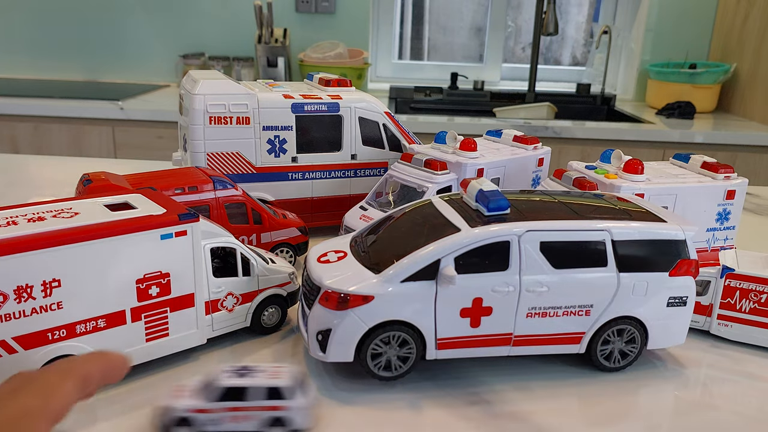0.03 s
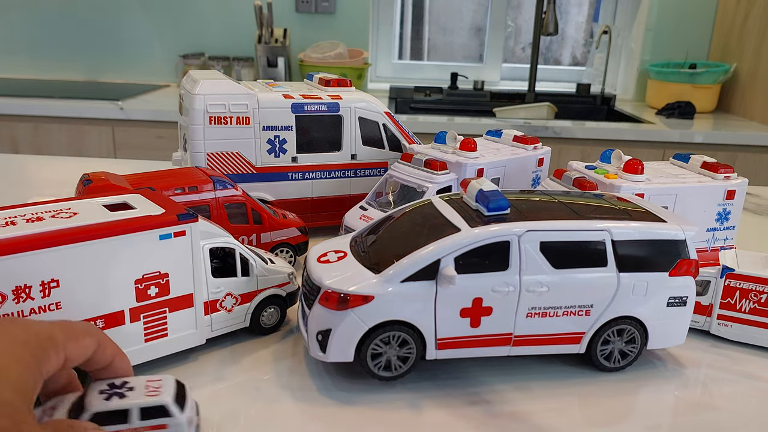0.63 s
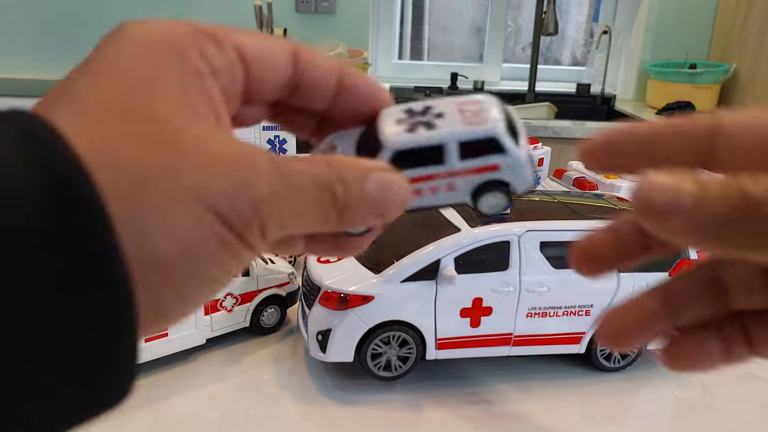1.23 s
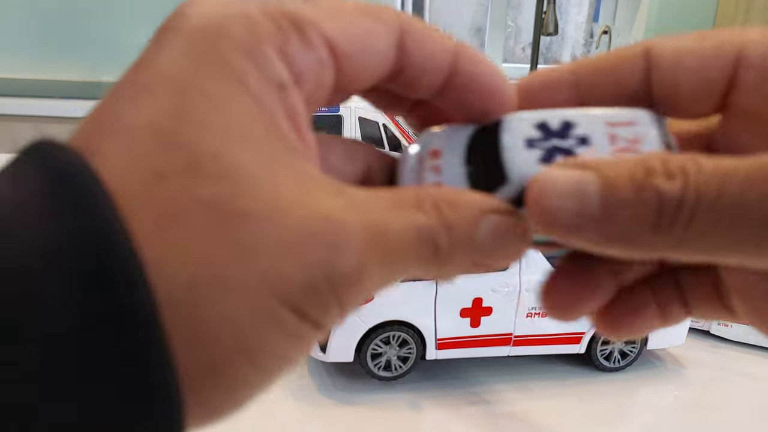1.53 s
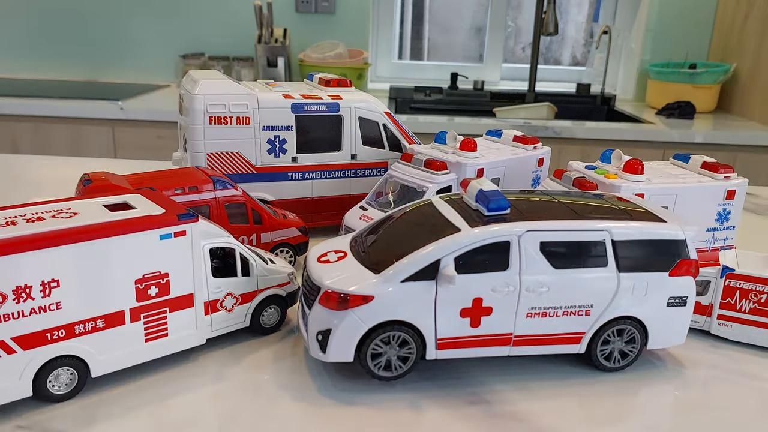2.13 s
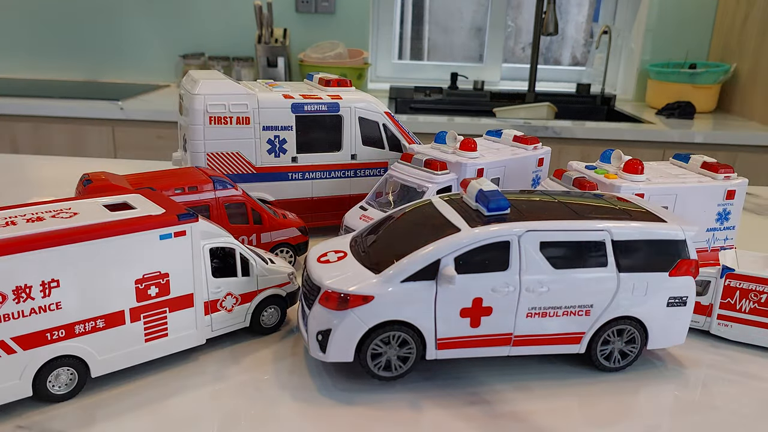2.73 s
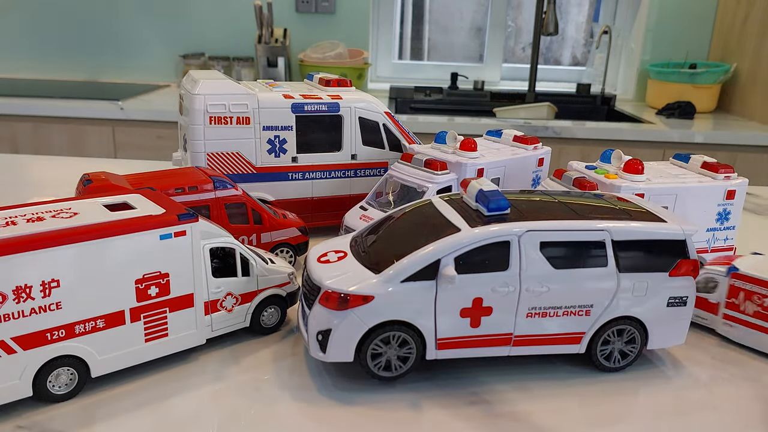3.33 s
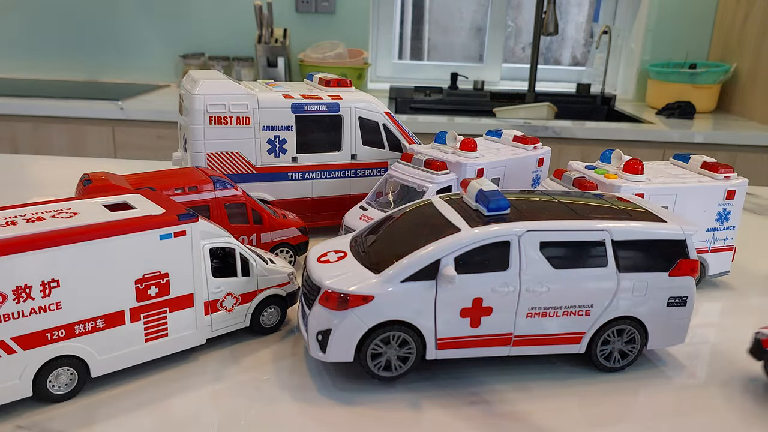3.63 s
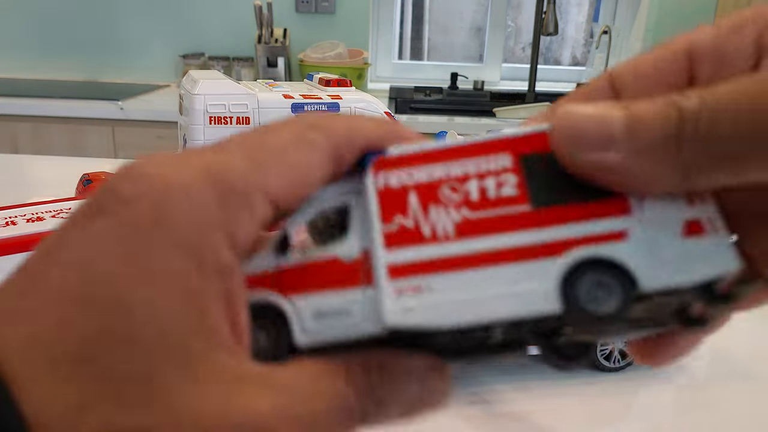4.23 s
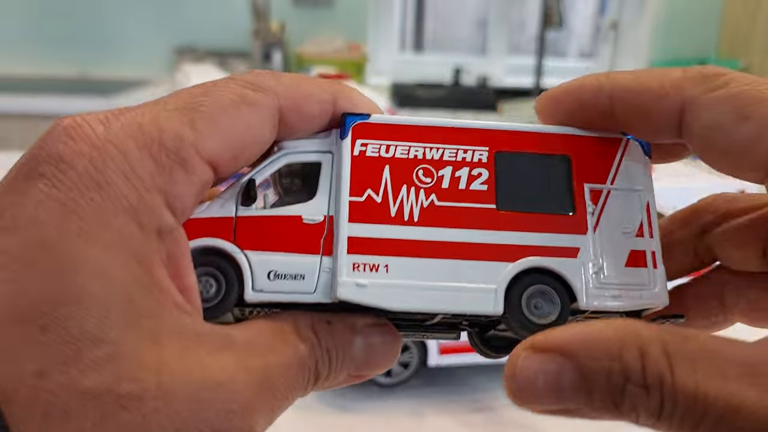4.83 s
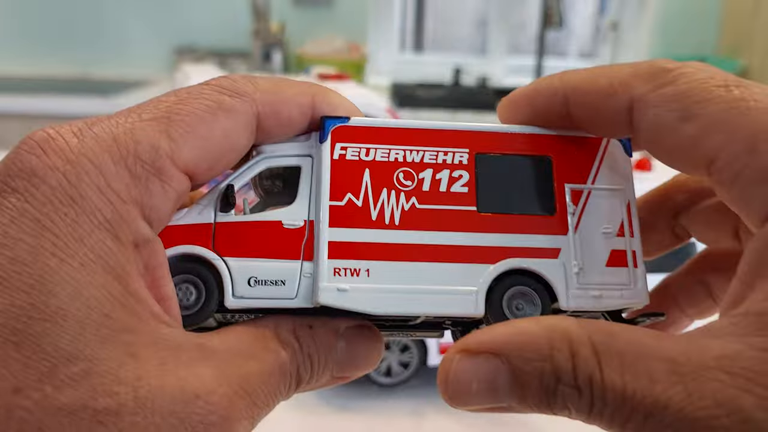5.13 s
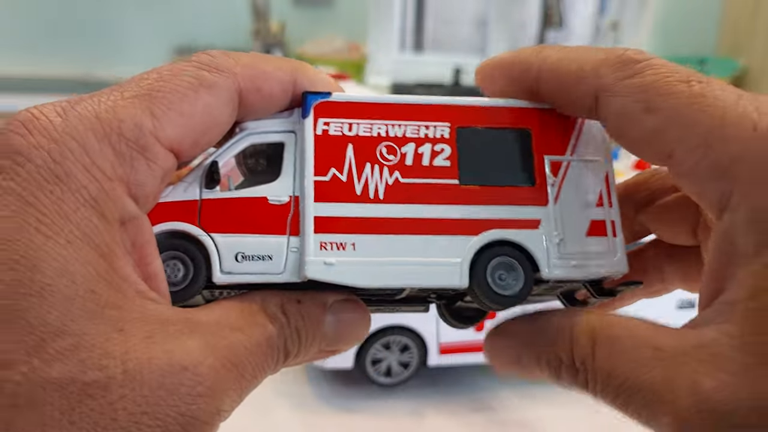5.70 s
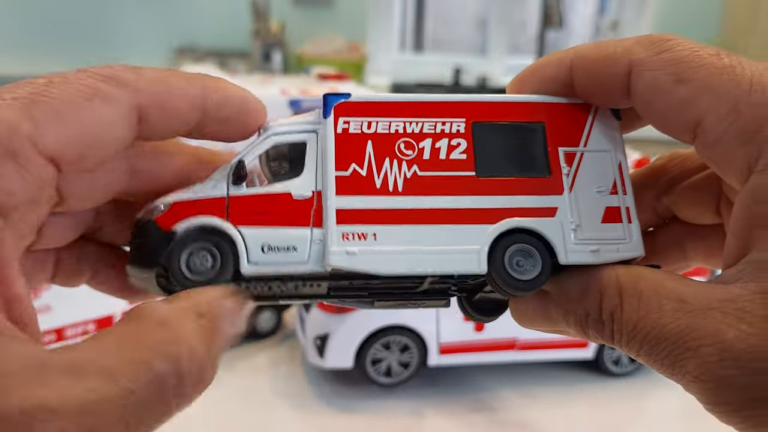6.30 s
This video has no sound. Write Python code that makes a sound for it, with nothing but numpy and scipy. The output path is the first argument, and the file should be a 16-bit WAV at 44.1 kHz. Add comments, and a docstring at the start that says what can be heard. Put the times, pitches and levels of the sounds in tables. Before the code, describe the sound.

A small toy car rolls briefly on a table with a thin axle squeak, then clicks and rasps as it is picked up and turned in the hands. It is put aside with a hollow, bouncing clatter, the loudest sound. A larger toy van then scrapes along the table and is turned in the fingers with scattered light clicks and rubs. The handling is close and dry in a quiet room with a faint hum.

```python
"""A table in a quiet room with mains hum; toy cars are handled close to the microphone.
A small car rolls with a singing axle, is picked up and rasps in the cupped hand; put aside, it lands
with a hollow clatter. A larger model van is pulled from the row and turned in the fingers, shell and
doors clicking. Clicks are noise bursts and rubbing is a stream of tiny slips, both ringing the shells;
the landing also rings the modes of the hollow surface."""
import sys
import numpy as np
from scipy import signal
from scipy.fft import rfft, irfft
from scipy.io import wavfile
from scipy.ndimage import uniform_filter1d

SR = 44100
rng = np.random.default_rng(int(sys.argv[2]) if len(sys.argv) > 2 else 0)


def generate_wav(sig):
    """Save sig (samples, or channels by samples) to the path in sys.argv[1] as 16-bit PCM at SR."""
    pcm = np.round(np.clip(np.atleast_2d(sig).T, -1, 1) * 32767).astype(np.int16)
    wavfile.write(sys.argv[1], SR, pcm)


N = 284886
TIME = np.arange(N) / SR
BAND_EDGES_HZ = [3000, 7500]  # body | edge | fizz

CAR_MODES = [(1810, 0.5, 80), (2080, -1, 130), (2260, 5, 130), (2640, 7.5, 110), (4040, 5, 81),
             (4800, 5.5, 67), (5450, 6, 140), (5870, 7, 110), (6500, 3.5, 120), (8740, 5.5, 500),
             (11000, -5, 370), (13100, 4, 340)]  # small car's shell: f/Hz, peak/dB, width/Hz
CAR_COLOUR = [(300, -17), (750, -22), (1150, -9.5), (1400, -14.5), (1750, -6), (2100, -2), (2700, -10.5),
              (3250, -14), (4150, -7), (4950, -10.5), (5800, -8), (7400, -13.5), (9500, -12.5),
              (12000, -8.5), (16000, -15.5)]  # its contact spectrum: f/Hz, level/dB
ROLL_COLOUR = [(410, -43.5), (700, -13), (946, -5), (1230, -7), (2130, 0), (3280, -11), (4210, 0),
               (5060, -3.5), (5760, -5.5), (8210, -21), (11100, -18), (15200, -20), (16000, -26)]  # rolling and brushing spectrum: f/Hz, level/dB
DIFFUSE_CORRELATION = [(60, 0.62), (150, 0.9), (300, 0.8), (600, 0.33), (1200, 0), (16000, 0.11)]  # room sound, left to right: f/Hz, correlation


def car_clicks():
    """Light knocks ring the small car's shell."""
    hits = [(0.154, -56, 3, -3.5, 4330), (0.1904, -57.5, -7.5, -2.5, 2700), (0.2997, -68.5, -2, 3, 1070),
            (0.3606, -81, 15, 4, 4790), (0.385, -73.5, -13, -4.5, 1750), (0.4414, -58.5, 5, 1.5, 2060),
            (0.459, -60.5, -5, 2.5, 2060), (0.4918, -53, 2, 2, 2120), (0.5122, -54.5, -10.5, -3, 2120),
            (0.6699, -69.5, -7.5, 11, 1980), (0.7203, -67.5, 2, 3.5, 3860), (0.7731, -60, -2, 4, 2200),
            (0.8091, -65, -7, 2, 2770), (0.8215, -62, 1, 5, 2370), (0.834, -58, -3, -2.5, 2340),
            (0.9028, -62, -6, -1, 2820), (0.922, -66, 3, -2, 2850), (0.9956, -65, 2, 4, 2270),
            (1.012, -62, -12, 3, 2570), (1.043, -63, -12.5, 14, 2260), (1.1338, -65.5, 20.5, 7, 2240),
            (1.1643, -59, 17, 4.5, 2030), (1.1892, -58, 6, 3, 2230), (1.2904, -49.5, 7, 6, 2230),
            (1.3843, -48.5, 0, 21, 5800), (1.509, -41, -1, 2.5, 2040), (1.5144, -49, -13, 31, 2080),
            (1.5309, -48.5, -4, 2, 2090), (1.5828, -70, -14.5, 24, 2150), (1.6247, -60.5, -7, -4, 5400),
            (1.6571, -50.5, -1.5, 3, 2230), (1.8507, -60.5, -4, 8, 2040), (1.9535, -72.5, -7, -10, 1330)]  # t/s, level/dB, hardness/(dB/band), pan/dB, spot f/Hz
    return clicks(hits, CAR_MODES, CAR_COLOUR, t60_s=0.023, spot_db=19.5, spot_q=6.1,
                  lift_db=7, band_db=(-8, -1.5, -10.5), shadow=0.55)


def car_roll():
    """Wheels rattle over the table with each push."""
    pushes = [(-0.01, 0.13, -48.5, -0.5, -2.5), (0.132, 0.073, -44.5, 1, 4), (0.25, 0.21, -64, 1, 10),
              (0.437, 0.08, -52, 1.5, 10), (0.548, 0.022, -63, 7, -2)]  # t/s, length/s, level/dB, hardness/(dB/band), swell/dB
    gains = strokes(pushes, attack_s=0.0068, release_s=0.018)
    return rubbing(gains, CAR_MODES[:1], ROLL_COLOUR, rate_hz=630, spread_db=5.5, t60_s=0.012,
                   hiss_db=0.6, band_db=(-0.3, -1.4, -10), pan_db=2.5)


def axle(width_hz=200, sag_hz_per_s=5200):
    """The axle sings on a push: narrow noise whose pitch sinks as the car slows."""
    whistles = [(0, 0.1, 4450, -57), (0.133, 0.041, 4400, -43), (0.421, 0.09, 3830, -53.5)]  # t/s, length/s, start f/Hz, level/dB
    pole = np.exp(-np.pi * width_hz / SR)
    noise = rng.standard_normal((2, N)) + 1j * rng.standard_normal((2, N))
    fuzz = signal.lfilter([1], np.poly([pole, pole]), noise)
    out = np.zeros((2, N))
    for start_s, length_s, hz, db in whistles:
        pitch_hz = hz - sag_hz_per_s * np.clip(TIME - start_s, 0, length_s)
        whistle = unit((fuzz * np.exp(2j * np.pi * np.cumsum(pitch_hz) / SR)).real)
        out += whistle * amp(db) * envelope(start_s, length_s, attack_s=0.0065, release_s=0.008)
    return out * panned(4.2)


def car_rasp(thinning=0.29):
    """Wheels and shell rasp in the hand; the body band thins as the fizz rises."""
    rub = [(0.68, -62, -12), (0.826, -52.5, -17), (0.874, -57, -14), (0.922, -43.5, -14.5),
           (0.966, -51, -12), (1.014, -46.5, -20), (1.092, -57, -7), (1.198, -43, -2), (1.358, -37, -6.5),
           (1.458, -43, -6), (1.5, -37.5, -12)]  # t/s, level/dB, relative fizz/dB
    t, db, fizz_db = np.transpose(rub)
    levels_db = [db - thinning * (fizz_db - fizz_db.mean()), db, db + fizz_db]
    gains = amp([np.interp(TIME, t, level) for level in levels_db])
    gains *= envelope(t[0], t[-1] - t[0], attack_s=0.0083, release_s=0.011)
    return rubbing(gains, CAR_MODES, CAR_COLOUR, rate_hz=1000, spread_db=3.5, t60_s=0.009,
                   hiss_db=-7, band_db=(-4.5, -2, 2.5), pan_db=2.0)


def cupped_hand(x, width_hz=330, resonance_db=7):
    """Air in the hand adds one resonance, moving as the hollow changes size."""
    hollow = [(0.7, 1840), (0.83, 2300), (0.93, 2900), (1.02, 2480), (1.1, 2160), (1.42, 2270), (1.5, 1890)]  # t/s, f/Hz
    centre_hz = np.interp(TIME, *np.transpose(hollow))
    carrier = np.exp(2j * np.pi * np.cumsum(centre_hz) / SR)
    pole = np.exp(-np.pi * width_hz / SR)
    baseband = signal.lfilter([1 - pole], [1, -pole], x / carrier + 1e-18)
    return x + amp(resonance_db) * 2 * (carrier * baseband).real


def landing():
    """The small car bounces, ringing more freely once let go."""
    bounces = [(2.4978, -34.5, -1.5, -3, 2400), (2.5175, -38, -0.5, -1.5, 6000),
               (2.5284, -37.5, -5, -1.5, 1810), (2.5484, -54, 7.5, -5, 5030), (2.5622, -44.5, -4, -1, 4200),
               (2.6257, -55, -4, 0, 2130), (2.6473, -53.5, -8.5, -1.5, 1860), (2.6824, -53, -4.5, -2, 1870),
               (2.7568, -67.5, 1.5, -0.5, 1240)]  # t/s, level/dB, hardness/(dB/band), pan/dB, spot f/Hz
    modes = [(1810, 3.5, 42), (1930, 2.5, 230), (2490, 5, 60), (2620, 6, 52), (2880, 6, 42),
             (4830, -3, 31.5), (5400, -19, 41), (6000, -9, 70), (7070, 9.5, 66)]  # free shell: f/Hz, peak/dB, width/Hz
    colour = [(200, -7.5), (500, 0.5), (850, -2), (1100, -5.5), (1500, -3), (2100, 1), (3500, -6.5),
              (5200, 0.5), (7000, -10.5), (8700, -11.5), (12000, -2), (16000, -11)]  # contact spectrum: f/Hz, level/dB
    return clicks(bounces, modes, colour, t60_s=0.057, spot_db=4, spot_q=13,
                  lift_db=6, band_db=(-6, -0.7, -0.3), shadow=4.5)


def thuds():
    """The car's weight hits the hollow surface; shorter contacts reach higher modes."""
    impacts = [(2.501, -24.5, 0.00043), (2.506, -16.5, 0.00093), (2.5155, -22, 0.00069),
               (2.530, -28.5, 0.0016), (2.539, -19.5, 0.0007), (2.563, -26.5, 0.0007),
               (2.647, -26.5, 0.00046), (2.684, -31.5, 0.0017)]  # t/s, level/dB, contact/s
    surface_modes = [(118.8, -8.5, 0.38), (167, -3, 0.07), (200, 4, 0.061), (243.5, -8, 0.26),
                     (302, -3.5, 0.065), (348, -0.5, 0.078), (386, -7, 0.12), (471, -4, 0.1),
                     (600, -22, 0.12), (690, 3, 0.042), (796, -13.5, .14), (950, -17, .08)]  # f/Hz, level/dB, t60/s
    t = np.arange(SR // 2) / SR
    out = np.zeros((2, N))
    for start_s, db, contact_s in impacts:
        ring = sum(amp(mode_db - 60 * t / t60_s) * np.sin(2 * np.pi * hz * t)
                   / (1 + (hz * contact_s) ** 2) for hz, mode_db, t60_s in surface_modes)
        add(out, start_s, amp(db - 8) * panned(-0.34) * ring)
    return butterworth(out, 100, "high")  # little radiates below the first mode


def van():
    """The van's shell and doors click; it scrapes along the table and under the fingers."""
    hits = [(3.261, -69, -12.5, -2.5, 1200), (3.2985, -60.5, -11, -3, 1240), (3.3187, -55, -7.5, -3, 1290),
            (3.402, -69.5, -12, -3, 1110), (3.5541, -56, -9, -3, 1090), (3.587, -65.5, -3, 0.5, 1200),
            (4.091, -74.5, 1.5, 1, 1900), (4.1759, -56, -5.5, 1, 1600), (4.2016, -38, 1.5, 1.5, 1193),
            (4.2024, -46, 0, 1, 6000), (4.4127, -63.5, -3.5, 0, 2100), (4.492, -61, -2.5, 1.5, 2030),
            (4.675, -75, -4, 0, 2000), (4.717, -70.5, -6, 7, 2080), (4.761, -64.5, -6, 2.5, 2070),
            (4.797, -69, 8, 4.5, 2770), (5.303, -83, -15.5, 1.5, 1200), (5.3233, -69.5, -6, -0.5, 4540),
            (5.392, -70.5, -7, 2, 1800), (5.4411, -59.5, -7.5, 8, 1860), (5.5724, -65.5, -15.5, -3.5, 1670),
            (5.7075, -54.5, -2, 8, 1920), (5.7843, -57, -2, 2, 1190), (5.8107, -54, -7, 9, 1110),
            (5.8515, -47, -3, 0.5, 3570), (5.8528, -46, 9, 0.5, 4800), (5.9465, -57, -11, 1, 2750),
            (6.112, -77, 8, 3, 1820), (6.132, -67, 0, 1.5, 1860), (6.1695, -59, -7, 1.5, 1260),
            (6.326, -52.5, -9.5, 3.5, 1310), (6.3783, -61, -4, 0, 1270), (6.4274, -57, -12.5, -1, 1270)]  # t/s, level/dB, hardness/(dB/band), pan/dB, spot f/Hz
    scrapes = [(3.225, 0.068, -68.5, -10, 12), (3.295, 0.052, -51.5, -5, 3.5),
               (3.36, 0.22, -67.5, -10.5, 6), (3.549, 0.041, -49.5, -5, 2.5), (3.61, 0.035, -62.5, -7, 6),
               (3.648, 0.057, -57, -7.5, -8), (3.72, 0.09, -73, -8.5, -3), (4.155, 0.041, -60, -4, 8),
               (4.225, 0.072, -61, -12, 2.5), (4.355, 0.13, -62.5, -3, -2.5), (4.493, 0.13, -57, -2, -13),
               (4.66, 0.17, -63.5, 0.5, -1), (5.26, 0.21, -74.5, -11, 9), (5.432, 0.12, -51.5, -7.5, 0.5),
               (5.575, 0.11, -68.5, -15.5, -6), (5.712, 0.13, -58, -2.5, -8), (5.856, 0.086, -44.5, 2, -12),
               (5.938, 0.04, -47.5, -4.5, 2.5), (5.99, 0.14, -61, -5.5, 0), (6.135, 0.048, -57.5, -10.5, 4),
               (6.317, 0.014, -50.5, -12, -3), (6.362, 0.071, -47.5, -5.5, 13.5)]  # t/s, length/s, level/dB, hardness/(dB/band), swell/dB
    modes = [(1110, 6.4, 88), (1251, 10.5, 24), (1670, 6.1, 52), (1810, 6.4, 30), (2200, 5.1, 57),
             (2773, 7.4, 22), (3830, 1.9, 75), (4230, 4.1, 51), (4650, 2.1, 74), (5630, 2.8, 130),
             (8540, 2.1, 79), (12260, 2.3, 300)]  # shell: f/Hz, peak/dB, width/Hz
    colour = [(400, -16.5), (850, -9.5), (1150, -2), (1800, 0.5), (2400, -1.5), (2800, -5), (3400, -11),
              (4200, -7.5), (5000, -11.5), (5700, -14), (7600, -22), (9500, -23.5), (12500, -20),
              (16000, -31.5)]  # contact spectrum: f/Hz, level/dB
    clicking = clicks(hits, modes, colour, t60_s=0.031, spot_db=16, spot_q=13,
                      lift_db=5.5, band_db=(-6.5, -1.5, -6), shadow=0.87)
    gains = strokes(scrapes, attack_s=0.0076, release_s=0.013)
    scraping = rubbing(gains, modes, colour, rate_hz=700, spread_db=2.5, t60_s=0.0077,
                       hiss_db=-2, band_db=(-0.55, -0.6, -8.5), pan_db=1.8)
    return clicking + scraping


def finger_slips(rise_s=0.0052, flutter=0.24):
    """A fingertip sticks on the plastic and lets go with a short, dull chirp."""
    slips = [(0.252, -42.5, 870), (0.264, -39.5, 772), (0.612, -53, 783), (0.625, -62, 746),
             (4.377, -57, 964), (4.432, -50.5, 750), (4.529, -53, 830)]  # t/s, level/dB, f/Hz
    t = np.arange(SR // 20) / SR
    pulse = t / rise_s * np.exp(1 - t / rise_s)
    out = np.zeros((2, N))
    for start_s, db, hz in slips:
        jitter = unit(uniform_filter1d(rng.standard_normal(len(t)), size=40))
        chirp = np.sin(2 * np.pi * np.cumsum(hz * (1 + flutter * jitter)) / SR)
        add(out, start_s, panned(5.4) * amp(db) * pulse * chirp)
    return out


def finger_brushes():
    """Fingers brush softly over the toys."""
    brushes = [(1.82, 0.03, -65, -3, 0), (1.856, 0.11, -62, -1.5, -13), (1.98, 0.14, -77, 5, -3),
               (2.14, 0.13, -66, 3, -2), (2.36, 0.09, -70.5, 0.5, -2.5), (2.95, 0.3, -71.5, 3, 1),
               (3.74, 0.077, -67.5, 6, -2.5), (3.83, 0.25, -82, 2, -8), (4.88, 0.095, -71.5, 0.5, 0)]  # t/s, length/s, level/dB, hardness/(dB/band), swell/dB
    gains = strokes(brushes, attack_s=0.0052, release_s=0.035)
    return rubbing(gains, CAR_MODES[:1], ROLL_COLOUR, rate_hz=900, spread_db=3.5, t60_s=0.01,
                   hiss_db=4, band_db=(-2.3, -2.0, -7), pan_db=3.5)


def clicks(hits, modes, colour, t60_s, spot_db, spot_q, lift_db, band_db, shadow):
    """Each contact rings the shell, with extra weight around the struck spot's note."""
    out = np.zeros((2, N))
    for start_s, db, hardness_db, pan_db, spot_hz in hits:
        burst = chatter(t60_s, lag_s=0.00025 * np.tanh(pan_db / 2))
        ring = coloured(burst, colour, list(modes) + [(spot_hz, spot_db, spot_hz / spot_q)])
        gains = tilted(db, hardness_db) * amp(band_db)
        gains[np.searchsorted(BAND_EDGES_HZ, spot_hz)] *= amp(lift_db)
        pans_db = [pan_db, pan_db, pan_db * shadow]  # far side shades short waves by their own amount
        for gain, side_db, band in zip(gains, pans_db, bands(ring)):
            add(out, start_s, gain * panned(side_db) * unit(band))
    return out


def rubbing(gains, modes, colour, rate_hz, spread_db, t60_s, hiss_db, band_db, pan_db, spots=12):
    """Tiny slips and knocks at several spots, plus hiss, all ring one shell."""
    sizes = amp(spread_db * np.minimum(rng.exponential(1, N), 3))
    impulses = sizes * (rng.random(N) < rate_hz / SR)
    spot = rng.integers(0, spots, N)
    grains = np.zeros((2, N))
    for k in range(spots):
        grain = chatter(t60_s, lag_s=0.00019, size=800)
        grains += signal.oaconvolve((impulses * (spot == k))[None], grain, axes=1)[:, :N]
    hiss = amp(hiss_db) * rng.standard_normal((2, N))
    ring = coloured(unit(grains) + hiss, colour, modes)
    out = np.zeros((2, N))
    for gain, db, band in zip(gains, band_db, bands(ring)):
        running_rms = np.sqrt(abs(uniform_filter1d((band ** 2).mean(0), size=2600)) + 1e-9)
        out += band / running_rms * gain * amp(db)
    return out * panned(pan_db)


def chatter(t60_s, lag_s, size=5000):
    """A contact chatters as a decaying noise burst; positive lag delays the right channel."""
    correlation = [(500, 0.96), (2000, 0.78), (4500, 0.071), (12000, 0.27)]  # direct sound, left to right: f/Hz, correlation
    left, right = stereo_noise(size, correlation) * amp(-60 * np.arange(size) / SR / t60_s)
    delay = round(abs(lag_s) * SR)
    late = lambda x: np.pad(x, (delay, 0))[:size]
    return np.array([left, late(right)] if lag_s > 0 else [late(left), right])


def coloured(x, colour, modes, size=4096):
    """Broad spectrum with resonances; minimum phase, so attacks stay sharp and modes ring on."""
    hz = np.fft.rfftfreq(size, 1 / SR)
    peaks = 1 + sum((amp(db) ** 2 - 1) / (1 + (2 * (hz - f) / width) ** 2) for f, db, width in modes)
    magnitude = amp(read(colour, hz)) * np.sqrt(np.maximum(peaks, 0.1))
    cepstrum = irfft(np.log(magnitude))
    cepstrum[1:size // 2] *= 2
    cepstrum[size // 2 + 1:] = 0
    response = irfft(np.exp(rfft(cepstrum)))
    return signal.oaconvolve(x, response[None], axes=1)[:, :x.shape[1]]


def strokes(rows, attack_s, release_s):
    """Band gains over time; each stroke swells or eases evenly in dB."""
    gains = np.zeros((3, N))
    for start_s, length_s, db, hardness_db, swell_db in rows:
        progress = np.clip((TIME - start_s) / length_s, 0, 1)
        shape = envelope(start_s, length_s, attack_s, release_s) * amp(swell_db * (progress - 0.5))
        gains += np.outer(tilted(db, hardness_db), shape)
    return gains


def envelope(start_s, length_s, attack_s, release_s):
    """Linear attack, hold, exponential release."""
    t = TIME - start_s
    return np.clip(t / attack_s, 0, 1) * np.exp(-np.maximum(t - length_s, 0) / release_s)


def tilted(db, hardness_db):
    """Band gains: a harder contact has more fizz, less body."""
    return amp(db + hardness_db * np.arange(-1, 2))


def bands(x):
    """Splits into body, edge and fizz."""
    low, high = BAND_EDGES_HZ
    return [butterworth(x, low, "low"), butterworth(x, [low, high], "band"), butterworth(x, high, "high")]


def butterworth(x, hz, kind):
    return signal.sosfilt(signal.butter(4, hz, kind, fs=SR, output="sos"), x)


def stereo_noise(size, correlation):
    """Noise with a given left-right correlation over frequency."""
    left, other = rfft(rng.standard_normal((2, size)))
    shared = np.clip(read(correlation, np.fft.rfftfreq(size, 1 / SR)), -1, 1)
    right = shared * left + np.sqrt(1 - shared ** 2) * other
    return irfft(np.array([left, right]), size)


def panned(db):
    """Channel gains, left db above right."""
    return unit(amp(np.array([[db], [-db]]) / 2))


def amp(db):
    return 10 ** (np.asarray(db) / 20)


def unit(x):
    """Scales to rms 1."""
    return x / np.sqrt(np.mean(x ** 2) + 1e-20)


def read(points, hz):
    """Interpolates over log frequency."""
    f, value = np.transpose(points)
    return np.interp(np.log(hz + 1), np.log(f + 1), value)


def add(mix, start_s, sound):
    part = mix[:, max(round(start_s * SR), 0):][:, :sound.shape[1]]
    part += sound[:, :part.shape[1]]


def room(x, onset_s=0.0032, treble_db=-1.5):
    """A diffuse tail builds up, then dies sooner in the treble."""
    decay = [(100, 0.86), (300, 0.79), (800, 0.82), (2000, 0.45), (5000, 0.49), (12000, 0.38)]  # f/Hz, t60/s
    hz, t, spectra = signal.stft(stereo_noise(SR, DIFFUSE_CORRELATION), SR, nperseg=256)
    shelf_db = read([(5000, 0.028), (9000, treble_db)], hz)[:, None]
    spectra *= amp(shelf_db - 60 * t / read(decay, hz)[:, None])
    tail = signal.istft(spectra, SR, nperseg=256)[1]
    tail *= 1 - np.exp(-(np.arange(tail.shape[1]) / SR / onset_s) ** 2)
    return signal.fftconvolve(x, tail / np.linalg.norm(tail[0]), axes=1)[:, :N]


def background(air_db=-55.5, waver=0.13, low_swell_power=0.32):
    """Room noise, faint hiss, mains hum; a low rumble swells as the hands move near the microphone."""
    air_colour = [(15, -54), (30, -29.5), (45, -6), (70, -22.5), (90, -12), (145, -5), (220, -9),
                  (280, -6.5), (470, -14.5), (640, -22), (1070, -24.5), (1400, -25.5), (2800, -36),
                  (6000, -37.5), (8800, -45), (12500, -41.5), (16000, -48)]  # room noise spectrum: f/Hz, level/dB
    hum = [(61, -58, 0.93), (120, -79.5, 2.4), (144.2, -66, 10), (190, -68, 16), (269, -61.5, 39)]  # mains line, then rumble bands: f/Hz, level/dB, width/Hz
    rumble_swell = [(0, -0.5), (1.05, 9), (1.7, 7.5), (2.1, -4.5), (3.1, -6), (3.6, 0), (4.6, 0),
                    (5.15, -13), (5.85, 7.5), (6.46, 6)]  # t/s, gain/dB
    hz = np.fft.rfftfreq(N, 1 / SR)

    def narrow_noise(centre_hz, width_hz):
        return unit(irfft(rfft(rng.standard_normal(N)) / (1 + ((hz - centre_hz) / width_hz) ** 2), N))

    air = unit(irfft(rfft(stereo_noise(N, DIFFUSE_CORRELATION)) * amp(read(air_colour, hz)), N))
    (mains_hz, mains_db, mains_width_hz), *rumble_bands = hum
    mains = np.sqrt(2) * np.sin(2 * np.pi * mains_hz * TIME)
    mains += waver * narrow_noise(mains_hz, mains_width_hz)
    *low, top = [amp(db) * narrow_noise(f, width) for f, db, width in rumble_bands]
    swell = amp(np.interp(TIME, *np.transpose(rumble_swell)))
    rumble = swell ** low_swell_power * sum(low) + swell * top
    return amp(air_db) * air + amp(mains_db) * mains + rumble


def scene():
    """Toys in the hands are near and dry; the landing is farther off and fills the room."""
    near = car_clicks() + car_roll() + axle() + cupped_hand(car_rasp())
    near += van() + finger_slips() + finger_brushes()
    clatter = landing()
    thud = thuds()
    reverb = room(amp(-16.0) * near + amp(-4.5) * clatter + amp(-7.5) * thud)
    return near + clatter + thud + reverb + background()


def record(dry):
    """The recorder's band limit."""
    cutoff_hz = 16100
    lowpass = signal.firwin(511, cutoff_hz, window=("kaiser", 9), fs=SR)
    return signal.oaconvolve(dry, lowpass[None], "same")


dry = scene()
out = record(dry)
generate_wav(out)
```